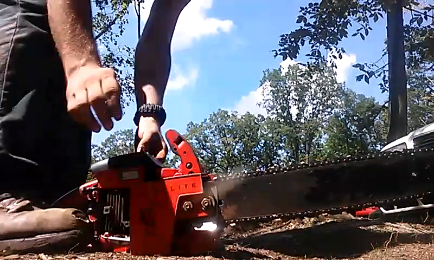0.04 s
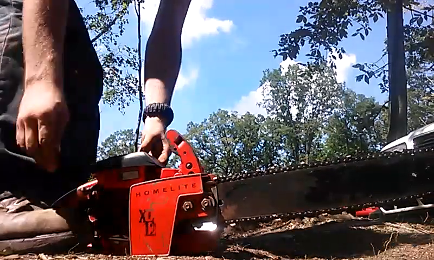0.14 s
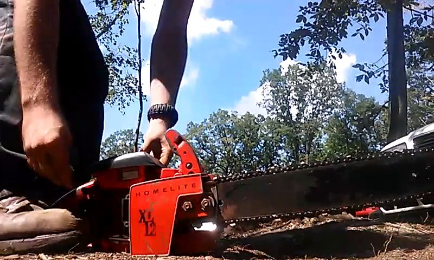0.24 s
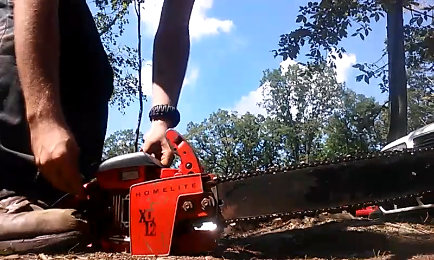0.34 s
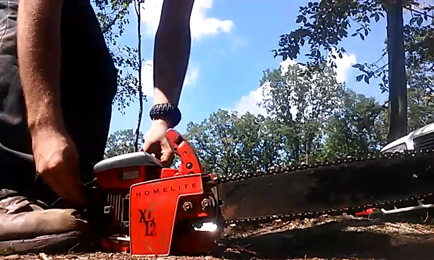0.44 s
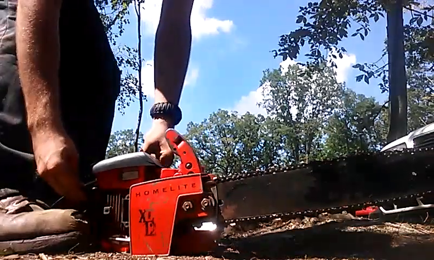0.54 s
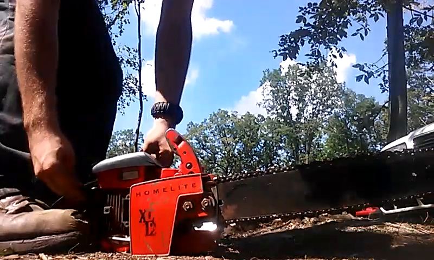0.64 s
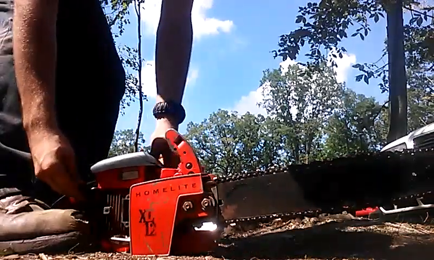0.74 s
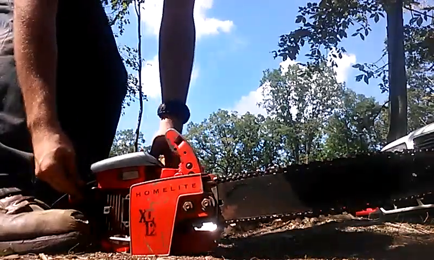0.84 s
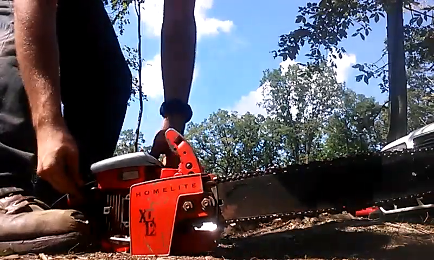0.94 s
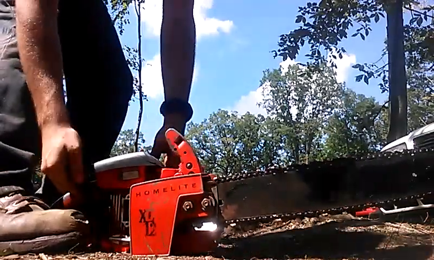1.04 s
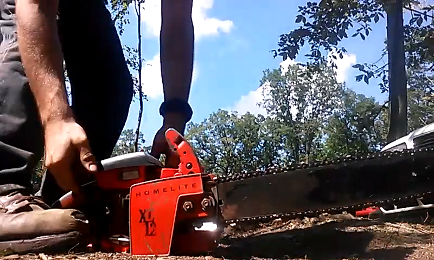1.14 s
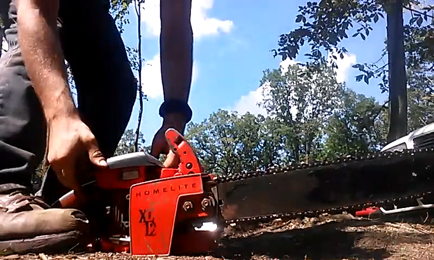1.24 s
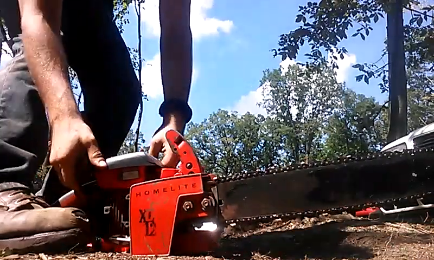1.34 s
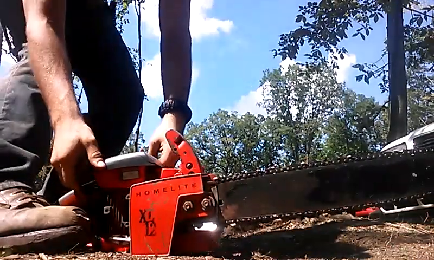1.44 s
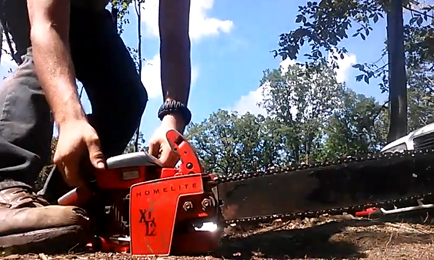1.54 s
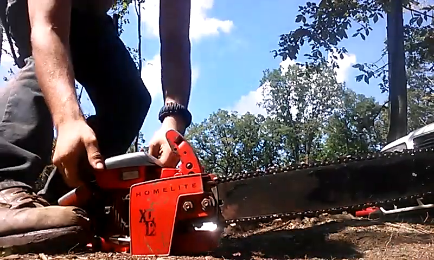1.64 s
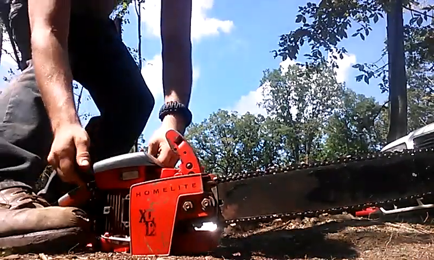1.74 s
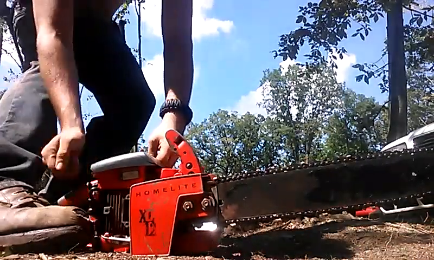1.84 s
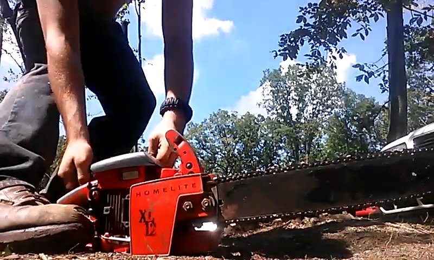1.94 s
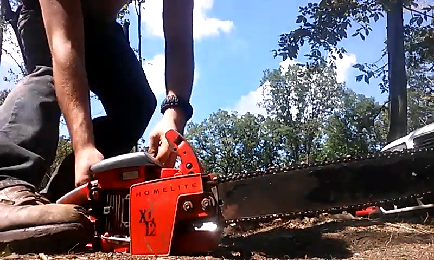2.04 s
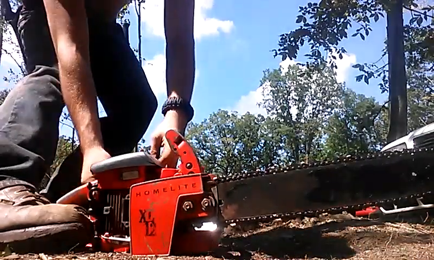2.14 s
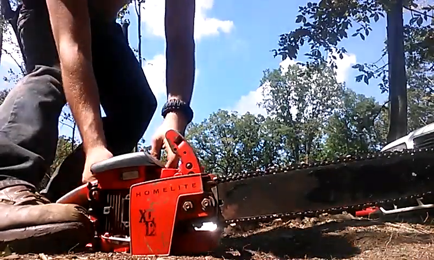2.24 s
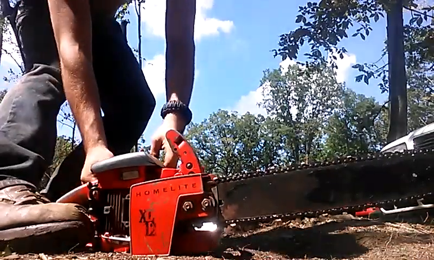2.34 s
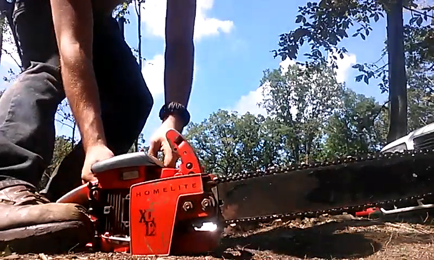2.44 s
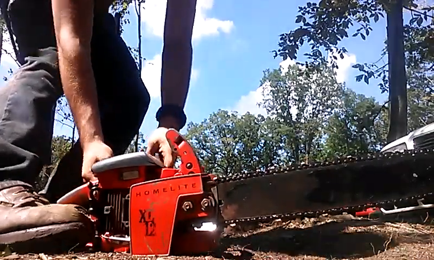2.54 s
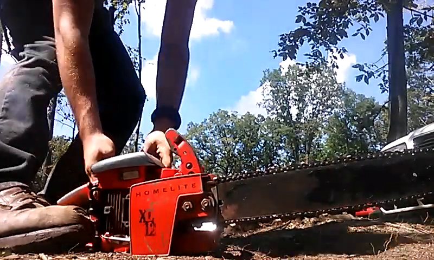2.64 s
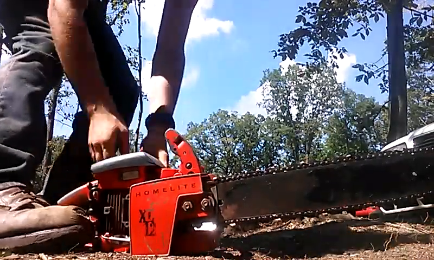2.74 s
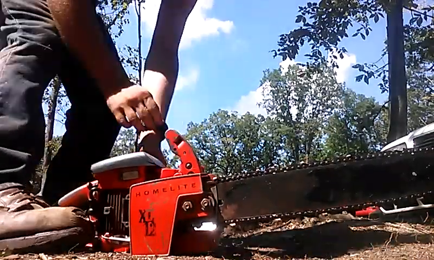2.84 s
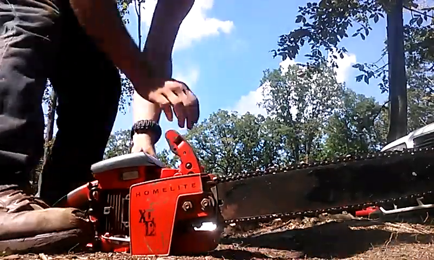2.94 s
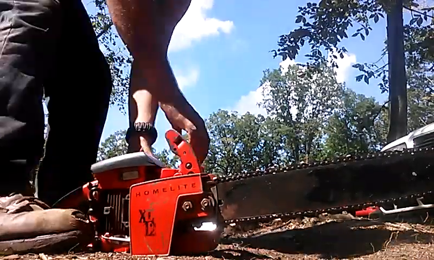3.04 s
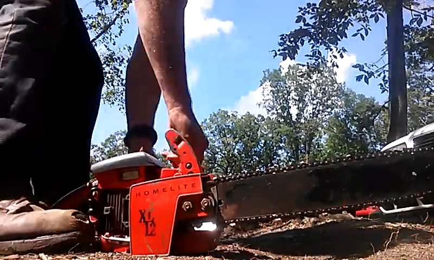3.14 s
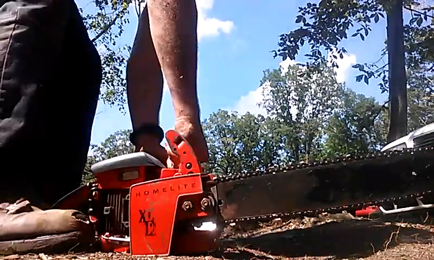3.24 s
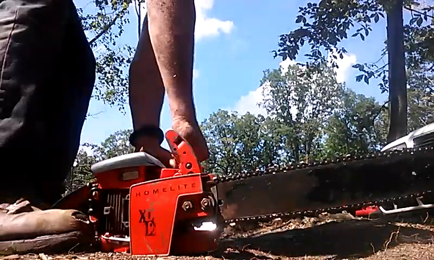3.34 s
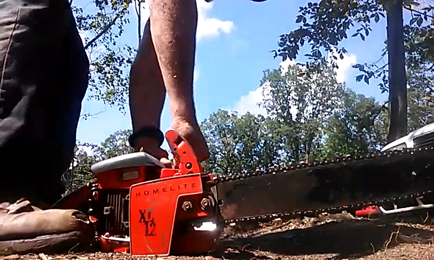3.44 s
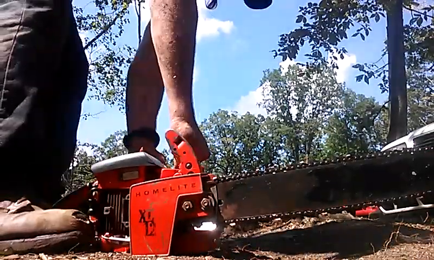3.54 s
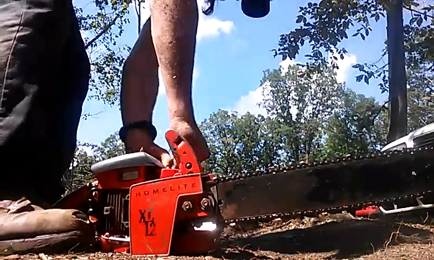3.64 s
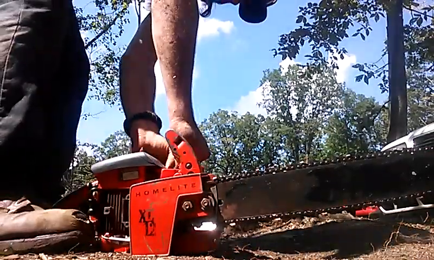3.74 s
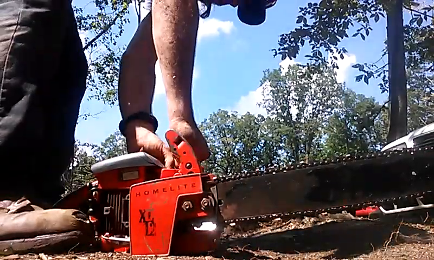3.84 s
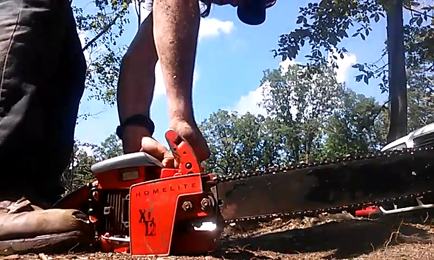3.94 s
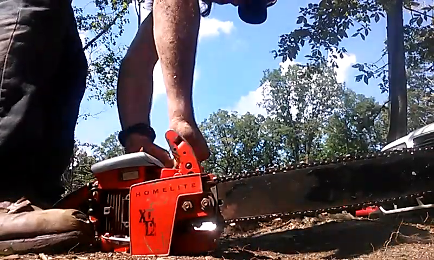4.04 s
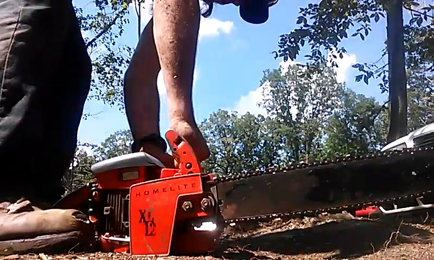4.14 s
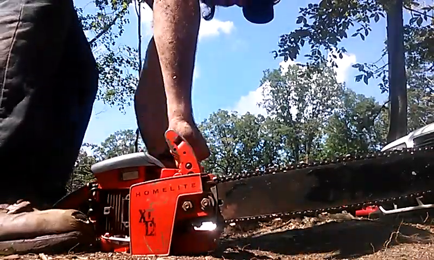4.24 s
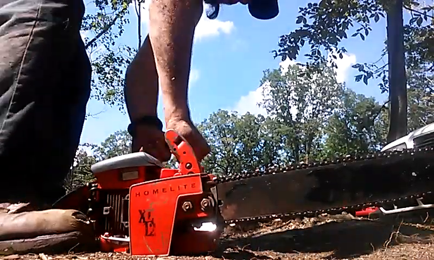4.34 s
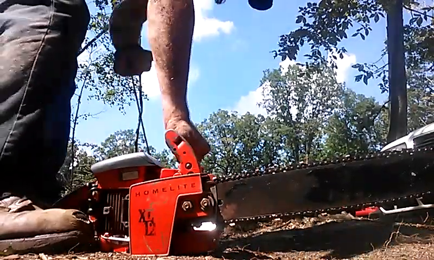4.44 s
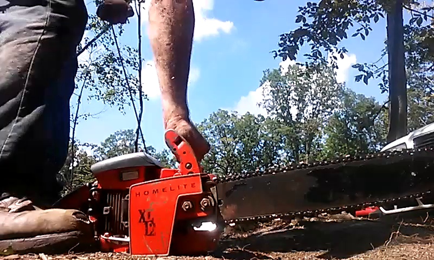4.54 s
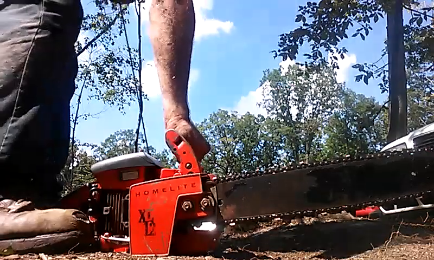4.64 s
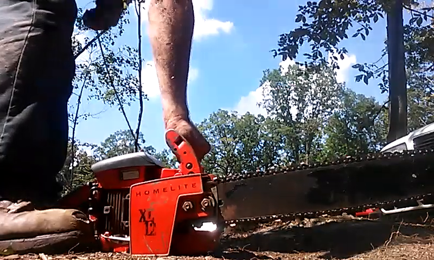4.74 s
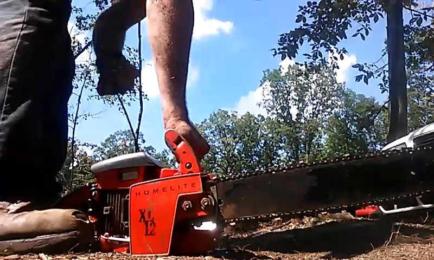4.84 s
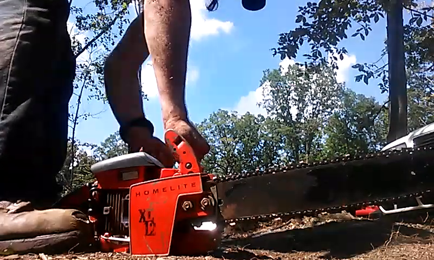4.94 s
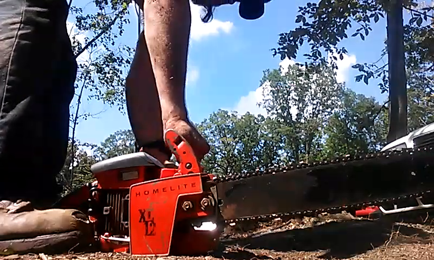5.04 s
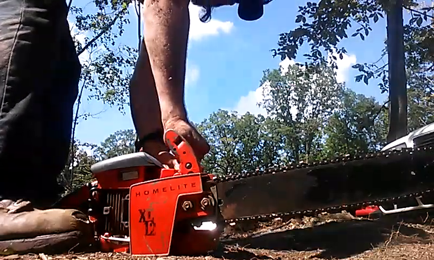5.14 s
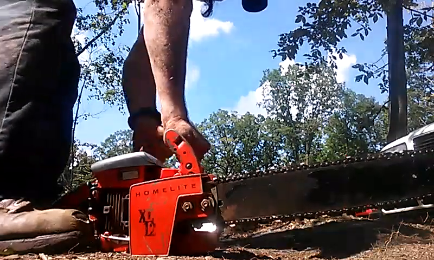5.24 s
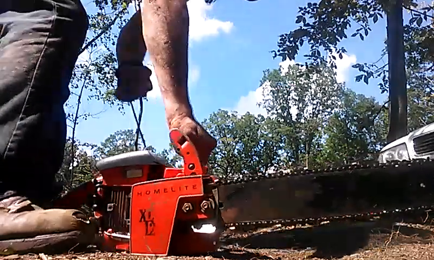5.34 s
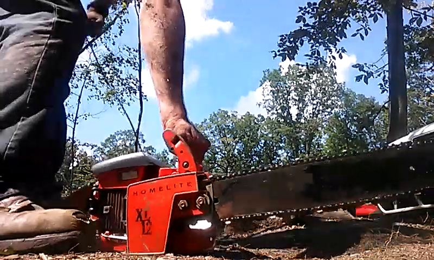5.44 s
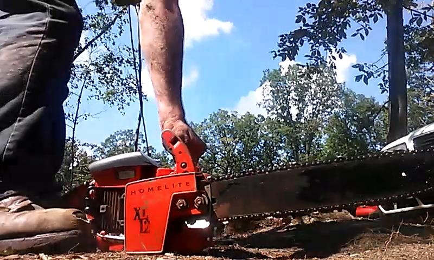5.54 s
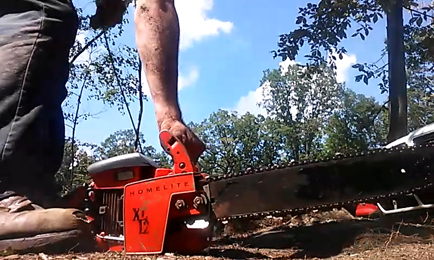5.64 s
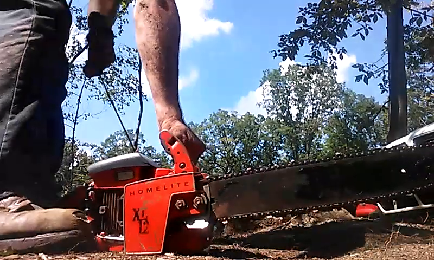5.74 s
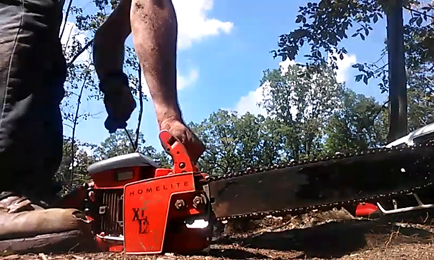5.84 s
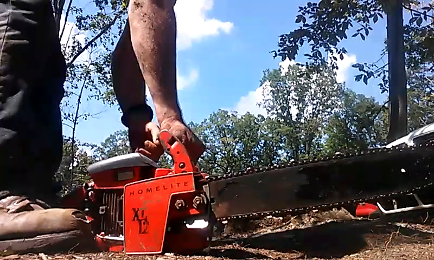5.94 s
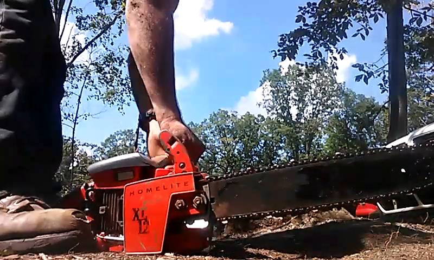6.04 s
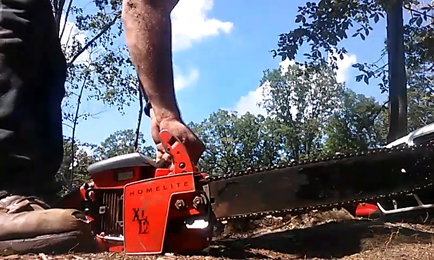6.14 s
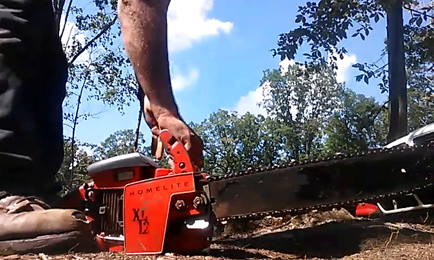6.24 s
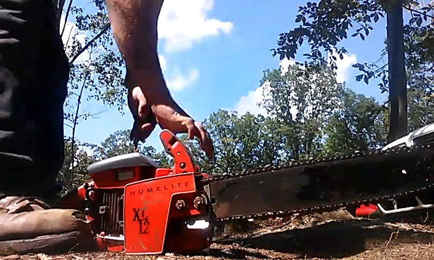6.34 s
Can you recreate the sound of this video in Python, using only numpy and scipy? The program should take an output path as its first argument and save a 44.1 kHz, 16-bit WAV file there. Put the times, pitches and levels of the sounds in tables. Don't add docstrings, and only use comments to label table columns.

```python
import sys
import numpy as np
from scipy import signal
from scipy.fft import rfft, irfft, next_fast_len
from scipy.io import wavfile
from scipy.ndimage import uniform_filter1d, map_coordinates

SR = 44100
rng = np.random.default_rng(int(sys.argv[2]) if len(sys.argv) > 2 else 0)


def voltage_ratio(level):
    return 10 ** (np.asarray(level, float) / 20)


def generate_wav(sig):
    pcm = np.round(np.clip(np.atleast_2d(sig).T, -1, 1) * 32767).astype(np.int16)
    wavfile.write(sys.argv[1], SR, pcm)


N = 281799


def unit(x):
    return x / np.sqrt(np.mean(x ** 2) + 1e-20)


def along(points, hz):
    f, v = np.transpose(points)
    return np.interp(np.log(hz + 1), np.log(f + 1), v)


def curves(rows):
    s, *cols = np.transpose(rows)
    return [voltage_ratio(np.interp(np.arange(N) / SR, s, c, -120, -120)) for c in cols]


def filtered(x, response):
    m = next_fast_len(x.shape[-1] + min(8192, x.shape[-1]))
    return irfft(rfft(x, m) * response(np.fft.rfftfreq(m, 1 / SR)), m)[..., :x.shape[-1]]


def noise(spectrum, shape=N):
    return unit(filtered(rng.standard_normal(shape), lambda hz: voltage_ratio(along(spectrum, hz))))


def wobble(rate):
    return map_coordinates(rng.standard_normal(int(N * rate / SR) + 4), [np.arange(N) * rate / SR])


def wander(shape, loose):
    return loose * np.cumsum(uniform_filter1d(rng.standard_normal(shape), size=24), axis=-1)


def fade(t, t60):
    return (t >= 0) * voltage_ratio(-60 * np.abs(t) / t60)


def bump(t, width):
    return np.exp(-(t / width) ** 2)


def swells(centres, halves, db, order):
    t = np.arange(N) / SR
    bells = [voltage_ratio(2 * d) * np.exp(-np.abs((t - c) / h) ** order) for c, h, d in np.broadcast(centres, halves, db)]
    return np.sqrt(sum(bells))


def placed(starts, rows):
    at = np.round(np.asarray(starts) * SR).astype(int)[:, None] + np.arange(rows.shape[1])
    ok = (at >= 0) & (at < N)
    return np.bincount(at[ok], rows[ok], N)


def glide(t, end_hz, extra_hz, tau):
    return 2 * np.pi * (end_hz * t + extra_hz * tau * (1 - np.exp(-np.abs(t) / tau)) * np.sign(t))


# port opens t/s, burn [0-1], turns until the next row (0 = at rest)
BURNS = [(-.0068, 0, 1), (.0138, .42, 3), (.079, .44, 8), (.2829, .49, 2), (.3446, 0, 1), (.3772, .56, 1),
         (.4128, 0, 2), (.4921, 0, 1), (.5366, .59, 1), (.5752, 0, 3), (.7206, 0, 1), (.7996, 0, 1),
         (.93, 0, 0), (4.5612, .26, 3), (4.6903, 0, 4), (4.8759, .27, 1), (4.9408, .74, 2), (5.0388, 0, 1),
         (5.1345, 0, 1), (5.3, 0, 0), (5.4708, .28, 1), (5.5223, .57, 3), (5.6096, .76, 2),
         (5.6658, .44, 2), (5.7231, .82, 3), (5.8001, .94, 3), (5.872, .83, 3), (5.9401, .92, 3),
         (6.0014, .62, 2), (6.0431, .75, 3), (6.1038, .83, 2), (6.1438, .55, 2), (6.1848, 1, 3),
         (6.2421, .95, 3), (6.2982, .78, 2), (6.3358, .79, 2), (6.3732, .76, 1), (6.392, 0, 0)]
# from t/s, speed squared lost each turn/Hz^2 (negative while the cord pulls),
# pressure behind the port level/dB, extra speed away from the squeeze f/Hz
LOADS = [
    (-1, 125, 1.5, 9),
    (.6, 125, 1.5, 11.2),
    (4.5, -106, .5, 4.5),
    (4.68, 113, 1.5, 8),
    (4.87, 113, 1.5, 4),
    (4.93, 113, 1.5, 10),
    (5.03, 113, 1.5, 13),
    (5.13, 113, 1.5, 6.4),
    (5.4, 55, 2, 1),
]
CHARGE_DB_PER_OCTAVE, CHARGE_HZ = 1.4, 33
OPEN_SHARE = .39


def turns():
    rows = []
    for (s, burn, count), (end, *_) in zip(BURNS, BURNS[1:]):
        _, loss, charge_db, free_hz = [load for load in LOADS if load[0] <= s][-1]
        trial = np.maximum(np.arange(1, 4000.)[:, None] - loss * np.arange(count), 1)
        squared = trial[np.argmin(np.abs(np.sum(trial ** -.5, axis=1) - (end - s)))]
        starts = s + np.cumsum(squared ** -.5) - squared ** -.5
        speed_hz = np.sqrt(squared + free_hz ** 2)
        open_ms = 1000 * OPEN_SHARE / speed_hz
        charge_db = charge_db + CHARGE_DB_PER_OCTAVE * np.log2(speed_hz / CHARGE_HZ)
        rows += zip(starts, open_ms, burn * (np.arange(count) == 0), charge_db)
    return np.transpose(rows)[:, :, None]


# f/Hz, signed size, t60/s
CYLINDER = [(518, 3.3, .011), (854, -4, .005), (872, .9, .022)]
POP_DB, HOLLOW_DB = 10, -8.5
SUCK_DB, SPIKE_DB, MUFFLED = -6, -4.5, .75


def cold_cylinder(t, u, pace, slow):
    v = np.maximum((t - .0011) / np.where(t < .0011, slow ** 2, .97) + .0025, 0)
    ring = 0
    for hz, size, t60 in CYLINDER:
        decay = fade(v, t60 * slow ** (3 * (t60 > .02)))
        ring = ring + size * np.sin(2 * np.pi * hz * v) * decay / slow ** (3 * (t60 < .02))
    pop = np.maximum(slow - .97, 0) * np.cos(2 * np.pi * 750 * (t - .0009)) * bump(t - .0011, .0007)
    hollow = np.cos(2 * np.pi * 315 / slow ** .4 * (t - .0012 - .009 * (slow - .97))) * fade(v, .13)
    middling = np.clip((pace - 1.02) / .05, 0, 1) * np.clip((1.16 - pace) / .03, 0, 1)
    suck = bump(t + .0005, .0007) - .6 * bump(t + .0018, .0003) + .7 * bump(t - .002, .0005)
    gulp = voltage_ratio(SPIKE_DB) * bump(t - .001, .00035) - voltage_ratio(SUCK_DB) * suck
    cold = (1 - MUFFLED * middling) * ring + voltage_ratio(HOLLOW_DB + 2.5 * middling) * hollow + voltage_ratio(POP_DB) * pop
    return cold * (1 - np.exp(-v / .0016)) * np.clip(-u / .001, 0, 1) + middling * gulp


WHISTLE_DB = -8
WARMING_HZ_PER_S, WARMING_DB_PER_S = 705.5, 17.5


def slit_whistle(t, u, s, pace, slow, hot, luck):
    late = .002 + .008 * np.maximum(pace - 1, 0)
    warm_s = np.maximum(s - 5.6, 0)
    flutter = 1 + .12 * noise([(600, 0), (1500, -6), (4000, -30)], u.shape)
    crack = np.sin(glide(t + .003, 3400, 2500, .0007)) * voltage_ratio(-14.5) * bump(t + .0012, .0013)
    pitch_hz = 4350 + 30 * luck[4] + WARMING_HZ_PER_S * warm_s
    whistle = np.sin(glide(u - .001, pitch_hz, -1300, 0.0043) + .6 * luck[2])
    whistle = whistle * voltage_ratio(WHISTLE_DB + luck[3] / 2 - WARMING_DB_PER_S * warm_s)
    whistle = whistle * bump(u - late, np.where(u < late, .0011, .0021)) * np.minimum((1.0 / slow) ** 6, 1)
    return flutter * ((1 - 0.43 * hot) * crack + (1 - .5 * hot) * whistle)


BLAST_DB = 14.5
AFTER_DB, AFTER_T60 = 2, .06


def burning_gas(t, u, burn, pace, luck, passage):
    note_hz = (440 + 500 * burn + 30 * luck[4]) * np.clip(1 - 9 * (pace - 1.055), .55, 1)
    blast = np.sin(glide(t + .0017, note_hz, 2300, .0006)) * voltage_ratio(9 * (1 - burn))
    blast = blast * fade(t + .0017, .014 + .018 * burn) * np.clip((t + .0017) / .003, 0, 1) ** 1.5
    roar = noise([(150, -19.5), (500, 1.5), (800, -7.5), (1050, -2.0), (1500, -13.5), (4000, -21.5),
                  (8000, -39.0), (15000, -40.0)], u.shape)
    shock = noise([(1500, -22.5), (4000, -1.0), (7000, -1.5), (11000, -3.0), (16000, -3.0)], u.shape)
    after = np.sin(2 * np.pi * np.maximum(note_hz, 560) * u + wander(u.shape, 0.1)) * fade(u - .003, AFTER_T60)
    flame = voltage_ratio(BLAST_DB) * blast + roar * voltage_ratio(8.5) * fade(t + .0008, 0.069)
    flame = flame + burn ** 4 * voltage_ratio(5) * fade(t + 0.0013, 0.015) * shock
    return flame + voltage_ratio(AFTER_DB) * after + passage * voltage_ratio(-9.5) * fade(t - .004, 0.028)


SNAP_DB = -1.5
HEAVE_DB, HEAVE_HZ = -12.5, 100


def engine():
    s, open_ms, burn, charge_db = turns()
    luck = rng.standard_normal((6, len(s), 1))
    lead = .006
    t = np.arange(round(.06 * SR)) / SR - lead
    u = t - open_ms / 1000
    hot = np.clip((burn - .2) / .3, 0, 1)
    ajar = np.clip((t + .001) / .002, 0, 1) * np.clip(-u / .001, 0, 1)
    pace = (open_ms / 9) ** .16
    slow = pace * (1 + .007 * luck[0])
    snap = -np.cos(2 * np.pi * 800 * u) * bump(u, np.where(u < 0, .001, .0004))
    snap = snap * np.minimum((1.15 / slow) ** 6, 1) * voltage_ratio(luck[1] / 2 + SNAP_DB)
    shove = voltage_ratio(-7.5) * slow * np.sin(2 * np.pi * 190 * t) * fade(t, 0.022)
    heave = np.clip((pace - 1.05) / .06, 0, 1) * np.sin(2 * np.pi * HEAVE_HZ * t) * fade(t, 0.023)
    swirl = noise([(100, -18.5), (200, 5), (300, -2.0), (450, -23.0), (900, -10.5), (1300, -11.0),
                   (2000, -15.0), (5000, -49.5)], u.shape)
    turn = (1 - hot) * cold_cylinder(t, u, pace, slow) + snap + shove + voltage_ratio(HEAVE_DB) * heave
    turn = turn + slit_whistle(t, u, s, pace, slow, hot, luck)
    passage = noise([(3200, -29.5), (3800, -9.0), (4050, 5.0), (4400, 4.0), (5200, -50.5)], u.shape)
    hiss = noise([(800, -10), (2000, -4), (4000, 0), (6500, -4), (8000, -26), (15000, -40)], u.shape)
    turn = turn + swirl * voltage_ratio(-22) * slow ** 3 * ajar * fade(t + .001, .12)
    turn = turn + passage * voltage_ratio(-21.5) * fade(u - .002, 0.023)
    turn = turn + hiss * (voltage_ratio(-19.5) * fade(u, 0.018) + (1 - hot) * voltage_ratio(-17.5) * fade(t + 0.0037, 0.017))
    flame = burning_gas(t, u, burn, pace, luck, passage)
    turn = voltage_ratio(charge_db) * turn + hot * voltage_ratio(10 * burn - 16.0 + luck[5]) * flame
    return placed(s[:, 0] - lead, turn)


SHELTER_DB = -3
SETTLE_DB_PER_S, SETTLE_S = 330, .035


def shut():
    s, open_ms, *_ = turns()[:, :, 0]
    t = np.arange(N) / SR
    last = np.maximum(np.searchsorted(s, t) - 1, 0)
    since = t - s[last] - open_ms[last] / 1000
    db = np.where(since < 0, SHELTER_DB, -SETTLE_DB_PER_S * np.minimum(since, SETTLE_S))
    return uniform_filter1d(voltage_ratio(db), size=80)


# t/s, level/dB
CORD = [(4.48, -60.5), (4.5, -37), (4.513, -32), (4.518, -25.5), (4.545, -20), (4.56, -18), (4.62, -12),
        (4.66, -16.5)]
# t/s, level/dB
DRUM = [(5.9, -52), (6.15, -40), (6.27, -30), (6.39, -29)]


def starter():
    catching = voltage_ratio(3 * wobble(150))
    scrape = noise([(200, -22.5), (500, -10.5), (1300, -0.5), (1900, -11.0), (3000, -14.5), (5900, -24.0),
                    (7500, -44.5)])
    cord = shut() * curves(CORD)[0] * unit(catching * scrape)
    drum = noise([(5800, -41.0), (6350, -11.0), (6500, -2), (6650, -13.0), (7500, -42.5), (8900, -41.5),
                  (9150, -11.5), (9400, -40)])
    return cord + curves(DRUM)[0] * voltage_ratio(4 * wobble(60)) * drum


# start t/s, stop t/s, rattle level/dB, rumble level/dB
MOTIONS = [
    (-.1, 0.758, -28.5, -15),
    (4.678, 5.138, -27, -14.5),
    (5.27, 5.44, -57, -71),
    (5.5, 6.5, -28.5, -15),
]
RISE_DB_PER_S, FALL_DB_PER_S = 344, 209.5


def moving():
    t = np.arange(N) / SR
    return np.array([voltage_ratio(-RISE_DB_PER_S * np.maximum(start - t, 0) - FALL_DB_PER_S * np.maximum(t - stop, 0))
                     for start, stop, *_ in MOTIONS])


# f/Hz, level/dB per Hz
RUMBLE = [(60, -36), (150, -9.5), (330, 5), (600, -6.5), (1200, -1.5), (1700, -5.5), (2400, -34),
          (3500, -51)]
# f/Hz, level/dB per Hz
RATTLE = [(1180, -22.5), (2000, -1.5), (2300, -1), (2790, -1), (3610, -16.5), (4590, -9.5), (5720, -11),
          (9000, -38), (11700, -77.5), (19800, -120)]
DRUM_RATTLE_DB = 3.5


def spinning():
    rattle, rumble = voltage_ratio(np.transpose(MOTIONS)[2:]) @ moving()
    rattle = rattle + voltage_ratio(DRUM_RATTLE_DB) * curves(DRUM)[0]
    lumpy, uneven = voltage_ratio(2 * wobble(90)), voltage_ratio(3.5 * wobble(160))
    return shut() * rumble * unit(lumpy * noise(RUMBLE)) + rattle * unit(uneven * noise(RATTLE))


# t/s, peak level/dB, f/Hz, t60/s, brightness level/dB
KNOCKS = [(.866, -4, 1173, 0.054, -2.5), (.872, -2.5, 666.5, 0.066, -21.5), (0.879, 1, 428, 0.016, -11),
          (.895, -1.5, 420, 0.022, -16), (.905, -11, 870, 0.038, -13), (.941, -29, 1300, 0.023, -11),
          (0.998, -40, 1300, 0.027, -4), (1.019, -39, 1300, 0.015, -2.5), (1.666, -45, 3110, 0.02, -11),
          (1.812, -54, 1430, 0.045, -9), (2.53, -54, 1500, .02, -2.5), (3.4885, -41.5, 1580, 0.0084, 13.5),
          (3.487, -39, 3970, 0.023, -7), (3.494, -56, 1450, .05, -4), (3.616, -61, 894, 0.018, -2),
          (3.619, -54, 560, 0.022, -7), (3.768, -53, 2800, 0.014, -9.5), (4.487, -46, 1376, 0.032, -19.5),
          (4.511, -26.5, 1300, 0.2, -21), (4.551, -8, 945, 0.093, -10.5), (4.639, 0.5, 1200, 0.022, -8),
          (4.677, -6, 1300, .02, -4.5), (5.139, -3.5, 1151, 0.019, -18), (5.528, -13, 3180, .09, -25),
          (5.22, 0, 1238, 0.054, -9.5), (5.23, -6, 590.4, 0.077, -6.5), (5.254, -9.5, 813, 0.035, -45),
          (5.266, -23, 563, 0.079, -35), (5.342, -10, 1240, 0.027, -13), (5.344, -27, 697, 0.086, -26),
          (5.404, -23.5, 1220, 0.058, -16), (5.429, -30, 1440, 0.042, -16), (5.451, -19, 1240, 0.056, -16),
          (5.464, -6, 1300, 0.042, -12)]


def knocks():
    s, db, hz, t60, bright_db = np.transpose(KNOCKS)[:, :, None]
    t = np.arange(SR // 8) / SR
    drift = wander((len(s), len(t)), .2)
    puff = noise([(800, -10.5), (2000, 1.5), (5000, -4.5), (7000, -12.5), (12000, -53.5)], drift.shape)
    rows = np.sin(2 * np.pi * hz * t + drift) + voltage_ratio(bright_db) * puff
    rows = rows * fade(t, t60) * (1 - np.exp(-t / 0.000638))
    return placed(s[:, 0], voltage_ratio(db) * rows)


def struck(events, modes, scatter_db, crack_db, attack, loose):
    t = np.arange(SR // 4) / SR
    puff = [(250, -70.5), (550, -18.5), (1000, -4.0), (3000, -4.0), (6000, -8.0), (9000, -26)]
    rows = []
    for _, db in events:
        blow = 0
        for hz, level, t60 in modes:
            strength = voltage_ratio(level + rng.normal(0, scatter_db))
            phase = rng.uniform(0, 2 * np.pi) + wander(len(t), loose)
            blow = blow + strength * fade(t, t60) * np.sin(2 * np.pi * hz * t + phase)
        blow = blow + voltage_ratio(crack_db) * fade(t, 0.033) * noise(puff, len(t))
        rows.append(voltage_ratio(db) * (1 - np.exp(-t / attack)) * blow)
    return placed([s for s, _ in events], np.array(rows))


# t/s, peak level/dB
PAWLS = [(0.7098, -6.5), (0.7719, -3), (0.8565, -18), (0.8824, -9), (4.8733, -8.5), (5.0792, -3.5),
         (5.096, -1), (5.1094, -8), (5.1234, -20), (5.1394, -12.5), (5.1553, -11.5), (5.1713, -14.5),
         (5.191, -9)]
# t/s, peak level/dB
GRAZES = [(4.589, -17.5), (4.6405, -15), (4.6733, -3.5), (4.7441, -6), (4.7536, -10), (5.471, -5.5),
          (5.5029, -12), (5.5304, -3.5), (5.5358, -7)]
# f/Hz, level/dB, t60/s
CUP = [(5010, -1.5, 0.039), (4585, 1, 0.018), (5340, -11, 0.042), (3635, 2.5, 0.0077), (2735, -9.5, 0.034),
       (1300, -6.5, 0.037), (5900, -14, 0.018), (11000, -23, 0.036), (11800, -25, 0.055)]
# t/s, peak level/dB
SWITCH = (1.6935, -14)
# f/Hz, level/dB, t60/s
LEVER = [(672, -5, .045), (1300, -1, 0.021), (1460, -10.5, 0.028), (1700, -4.5, 0.025), (1850, -1, 0.02),
         (2350, 2, 0.0097), (2760, 7.5, 0.0095), (3070, -9, .023), (3350, -14, .03), (3900, -18, 0.023),
         (4350, -19, 0.032), (5574, 2, 0.0061)]


def small_parts():
    parts = struck(PAWLS, CUP, scatter_db=4.5, crack_db=-12.5, attack=0.0012, loose=.18)
    parts = parts + struck(GRAZES, CUP[:7], scatter_db=4, crack_db=-6, attack=.002, loose=.2) * voltage_ratio(-3)
    click = struck([SWITCH], LEVER, scatter_db=1.5, crack_db=-7.5, attack=0.00056, loose=0.055)
    return parts + click * voltage_ratio(-8.0)


# f/Hz, level/dB, t60/s
BAR = [(1803, 0, .32), (2640, -14, .3)]


def steel_bar():
    return struck([(.87, -31)], BAR, scatter_db=0, crack_db=-40, attack=.002, loose=.01)


# f/Hz, t60/s
TREES = [(200, .13), (1500, 0.12), (6000, 0.21)]
FAR_DB, FAR_T60 = -29.5, 0.77


def trees(x):
    hz, t, z = signal.stft(rng.standard_normal(SR), SR, nperseg=256)
    decay = voltage_ratio(-60 * t / along(TREES, hz)[:, None]) + voltage_ratio(FAR_DB - 60 * t / FAR_T60)
    tail = signal.istft(z * decay, SR, nperseg=256)[1]
    return signal.fftconvolve(np.pad(x, (300, 0)), tail / np.linalg.norm(tail))[:N]


# centre t/s, half length t/s, level/dB
SCRAPES = [(3.307, .05, -77), (3.487, 0.031, -67)]
# centre t/s, half length t/s, level/dB
THUDS = [(3.16, .06, -83), (3.296, .03, -81), (3.52, 0.047, -76.5), (3.669, 0.039, -78)]


def fingers():
    scrape = noise([(1100, -42), (1330, -8.0), (1420, -7.0), (1550, -7.0), (1900, -40)]) * voltage_ratio(2.3 * wobble(76))
    thud = noise([(40, -31), (80, -2.5), (130, -7), (220, -8.5), (400, -38.0)])
    return swells(*np.transpose(SCRAPES), order=2) * scrape + swells(*np.transpose(THUDS), order=2) * thud


# centre t/s, half length t/s, rustle level/dB, hiss level/dB
HANDS = [(0.943, 0.045, -48.5, -54.5), (1.003, 0.1, -69.5, -70), (1.806, 0.13, -70, -82),
         (2.217, 0.083, -77, -84), (3.418, 0.14, -69, -82), (3.537, 0.101, -69.5, -80),
         (4.301, 0.13, -81.5, -81), (5.351, 0.16, -64, -68)]
# f/Hz, level/dB per Hz
SLEEVES = [(30, -21.5), (150, -4.5), (500, -2), (900, -9), (1450, -2), (2500, -7), (4500, -14),
           (6500, -41.5)]
# f/Hz, level/dB per Hz
LEAVES = [(30, -21.5), (100, -5), (250, -8), (700, -13.5), (1400, -8.5), (3500, -12.5), (4300, -9),
          (6500, -32)]
LEAVES_DB = -73


def rustle():
    centre, half, low_db, _ = np.transpose(HANDS)
    leaves = voltage_ratio(LEAVES_DB + 0.5 * wobble(7.5)) * noise(LEAVES)
    sleeves = unit(voltage_ratio(1.3 * wobble(90)) * noise(SLEEVES))
    return leaves + swells(centre, half, low_db, order=2) * sleeves


# centre t/s, level/dB
CHIRPS = [(1.1, -67), (1.32, -76.5), (1.56, -73), (1.79, -66.5), (2.07, -68.5), (2.3, -68), (2.57, -68.5),
          (2.85, -69), (3.1, -63.5), (3.33, -65), (3.56, -66), (3.82, -75), (4.05, -73), (4.31, -69)]
CHIRP_HALF_S, CHIRP_GAP_DB = 0.046, -80.5
# t/s, peak level/dB
TICKS = [(2.1245, -46.5), (2.1766, -48), (2.2302, -49), (2.2839, -46.5)]


def insects():
    low = noise([(4300, -41), (4580, -6.5), (4720, -4), (4850, -11.5), (5100, -40.0)])
    high = noise([(4450, -42.5), (4720, -8.0), (4850, -1.5), (5000, -11.0), (5200, -40.5)])
    chorus = low * voltage_ratio(4.6 * wobble(5)) + high * voltage_ratio(4 * wobble(4.2))
    steady = chorus / np.sqrt(np.abs(uniform_filter1d(chorus ** 2, size=4000)))
    centre, db = np.transpose(CHIRPS)
    pulse = voltage_ratio(CHIRP_GAP_DB) + swells(centre, CHIRP_HALF_S, db, order=2)
    buzz = pulse * unit(voltage_ratio(2.005 * wobble(80)) * steady)
    s, db = np.transpose(TICKS)[:, :, None]
    tick = filtered(placed(s[:, 0], voltage_ratio(db + 8.0)), lambda hz: (1j * hz / (1j * hz + 5000)) ** 2)
    return buzz + tick


# f/Hz, level/dB per Hz
AIR = [(4000, -7), (6000, 2.5), (8000, -4), (12000, -2), (15500, -1.5)]
# centre t/s, half length t/s, level/dB
SIZZLE = (2.203, .09, -72.5)
# t/s, t60/s, level/dB
BRUSH = (1.693, 0.68, -66.5)
AIR_DB, STIRRED_AIR_DB = -75.5, -61


def high_air():
    centre, half, _, high_db = np.transpose(HANDS)
    air = voltage_ratio(AIR_DB) + swells(centre, half, high_db, order=2) + voltage_ratio(STIRRED_AIR_DB) * moving().max(axis=0)
    brush_s, brush_t60, brush_db = BRUSH
    air = air + swells(*SIZZLE, order=12) + voltage_ratio(brush_db) * fade(np.arange(N) / SR - brush_s, brush_t60)
    return air * noise([(2500, -61.0)] + list(AIR))


def scene():
    small = filtered(small_parts(), lambda hz: (1j * hz / (1j * hz + 350)) ** 4)
    saw = engine() + filtered(knocks(), lambda hz: 1j * hz / (1j * hz + 150)) + small
    bar = steel_bar()
    near = saw + voltage_ratio(-15.0) * trees(saw) + spinning() + starter() + bar
    heard = filtered(near, lambda hz: (1 + (hz / 8000) ** 4) ** -.5)
    return (heard + high_air() + rustle() + insects() + fingers())[None]


# t/s, length t/s
STUCK = [(5.726, .007), (5.943, .006), (6.1875, .003)]


def overloaded(x):
    t = np.arange(N) / SR
    for s, length in STUCK:
        ring = voltage_ratio(-15) * fade(t - s, .025) * np.sin(2 * np.pi * 4000 * (t - s))
        sag = -voltage_ratio(-4) * np.sin(glide(t - s, 40, 200, .002)) * fade(t - s, .03)
        x = np.where((t >= s) & (t < s + length), ring + sag, x)
    return x


def low_pass(x):
    return signal.sosfilt(signal.butter(12, 16500, fs=SR, output="sos"), x)


def record(dry):
    x = overloaded(dry)
    x = x / (1 + np.abs(x / .97) ** 8) ** (1 / 8)
    x = filtered(x, lambda hz: 1j * hz / (1j * hz + 40) * np.where(hz < 15900, 1, .2))
    return low_pass(np.clip(x, -1, 1))


dry = scene()
out = record(dry)
generate_wav(out)
```